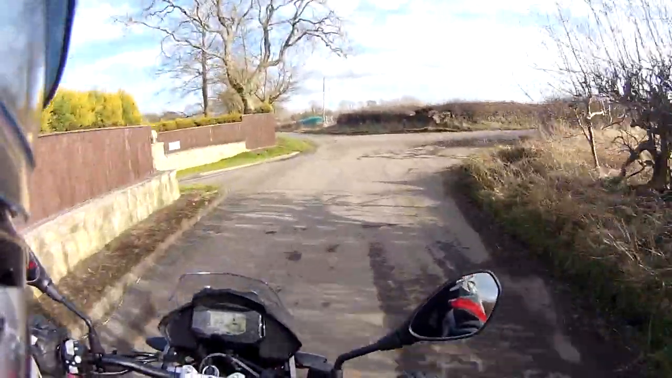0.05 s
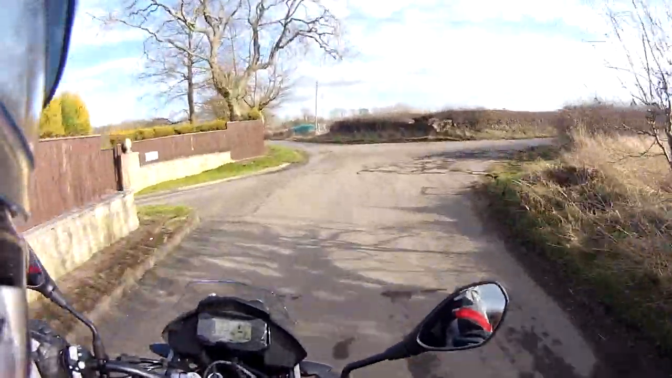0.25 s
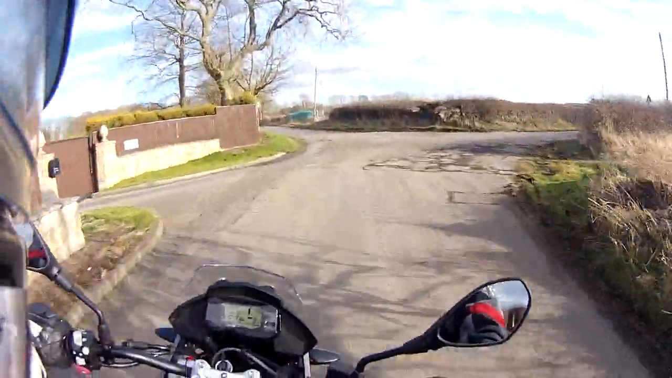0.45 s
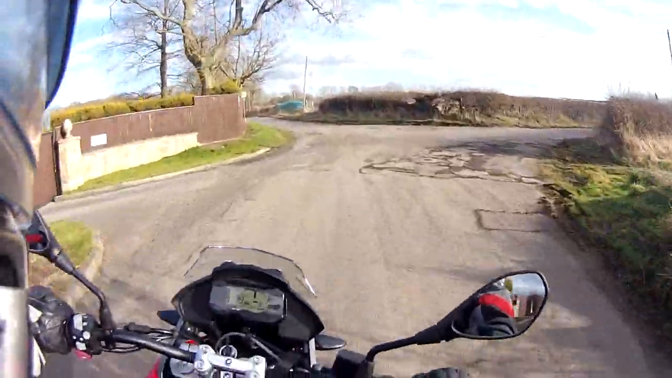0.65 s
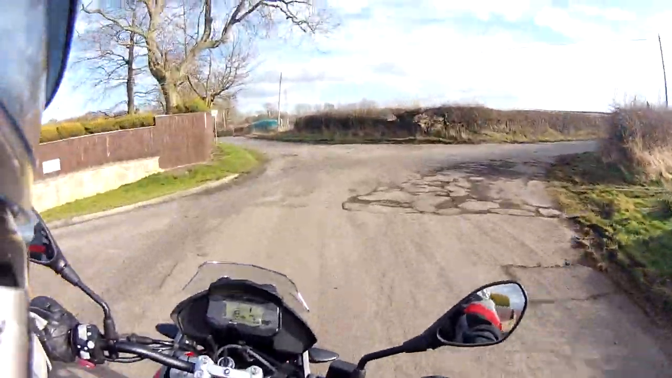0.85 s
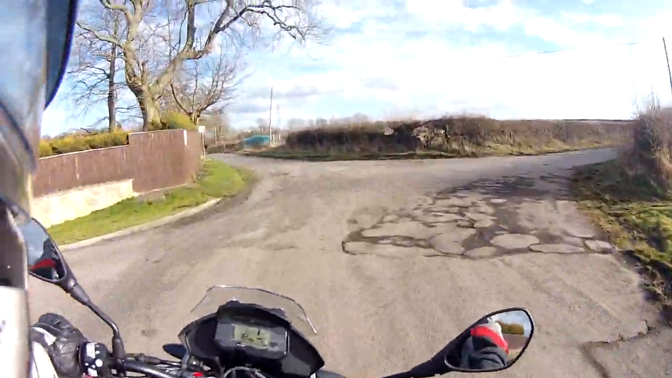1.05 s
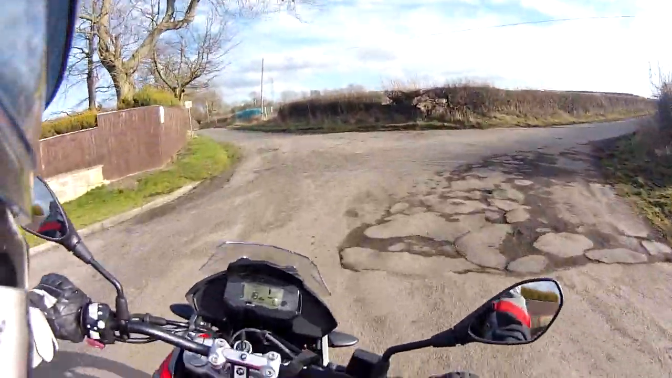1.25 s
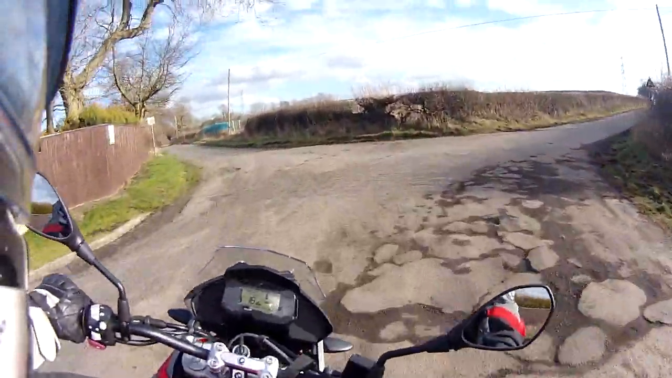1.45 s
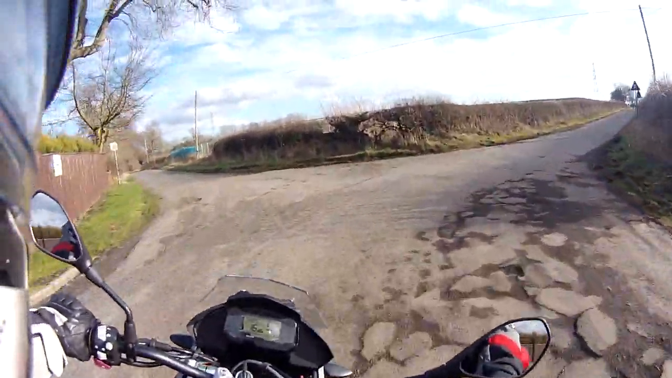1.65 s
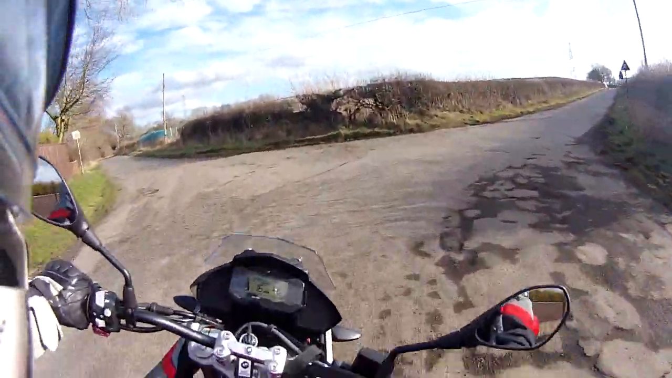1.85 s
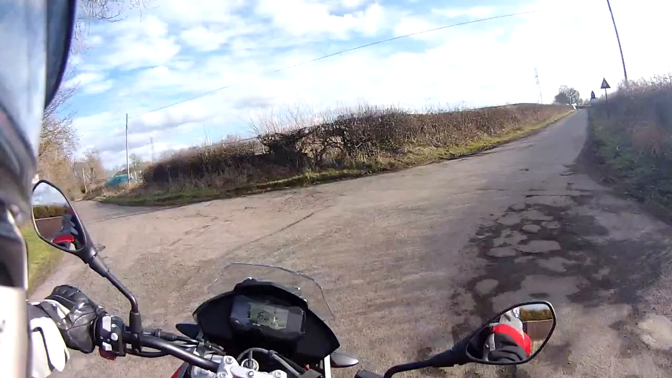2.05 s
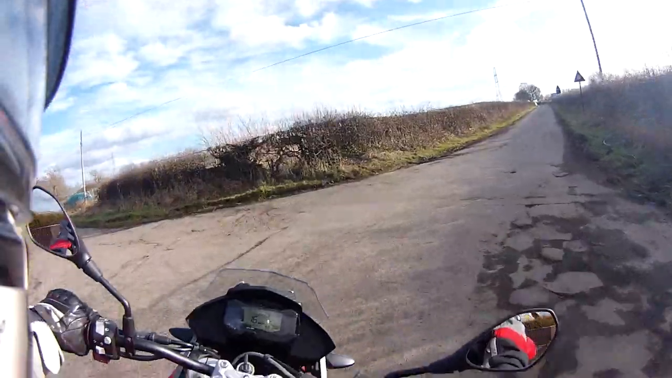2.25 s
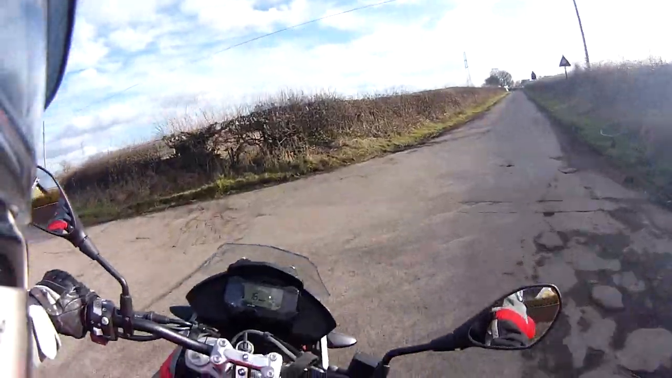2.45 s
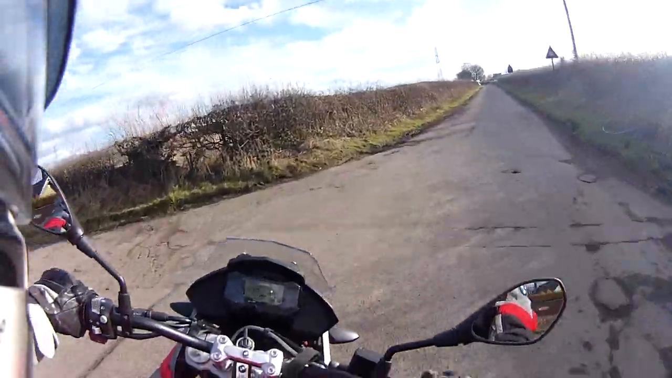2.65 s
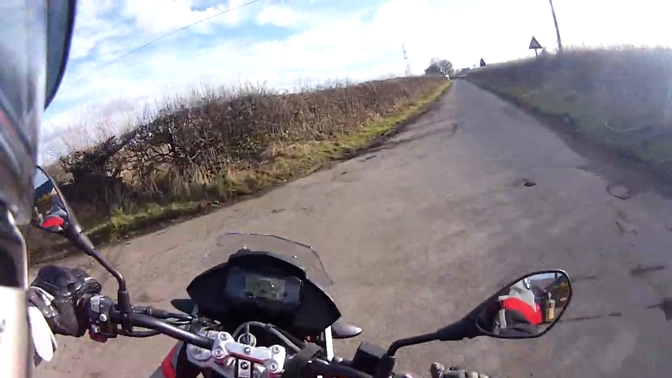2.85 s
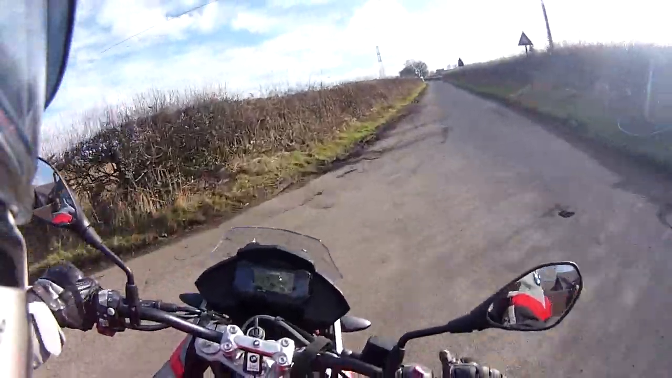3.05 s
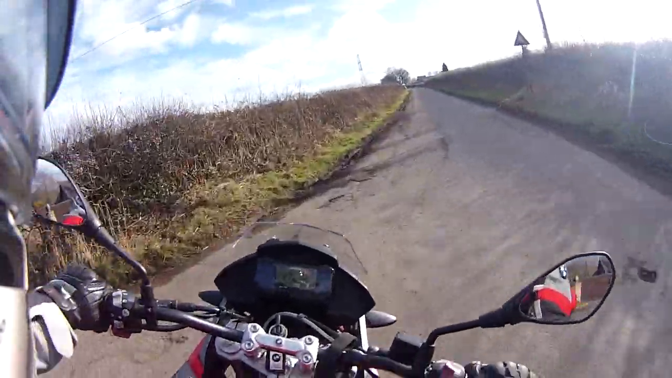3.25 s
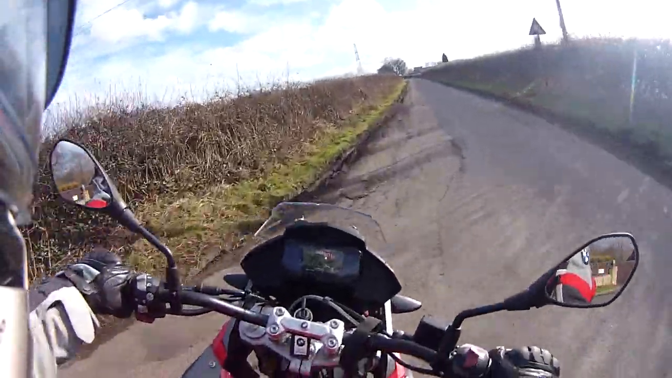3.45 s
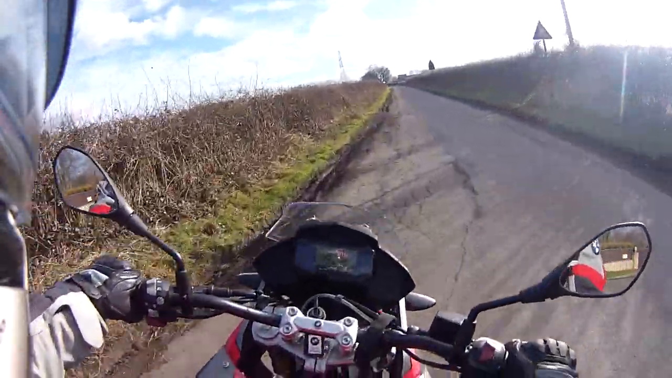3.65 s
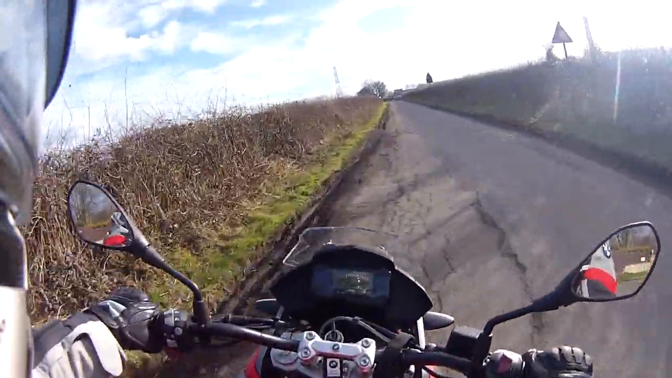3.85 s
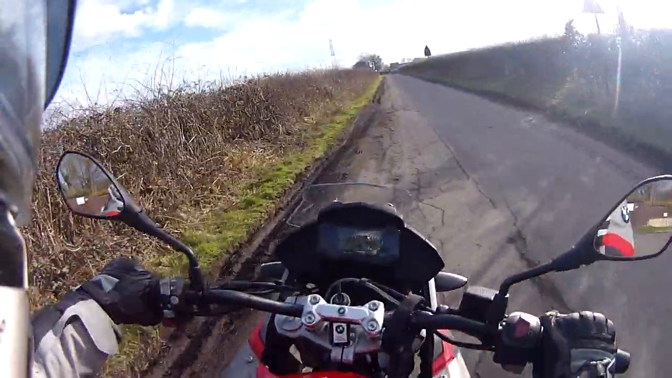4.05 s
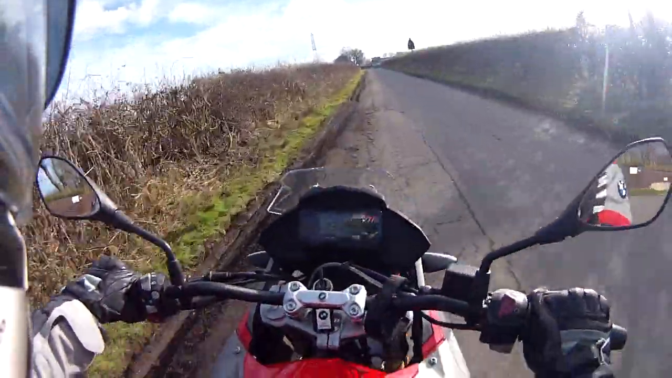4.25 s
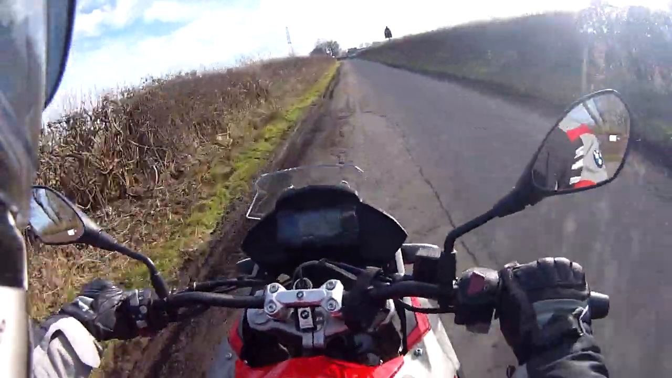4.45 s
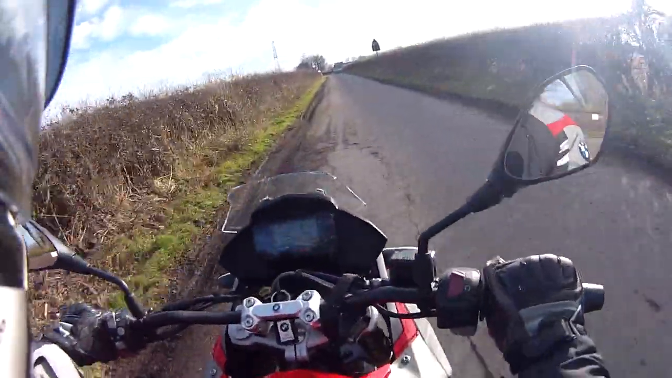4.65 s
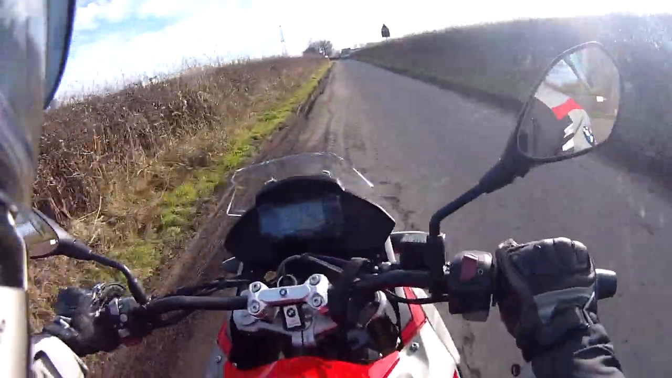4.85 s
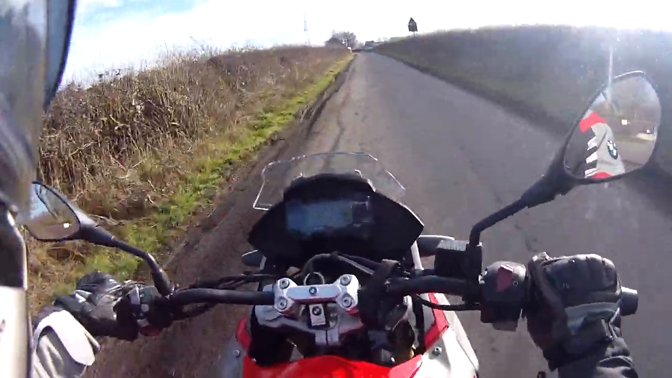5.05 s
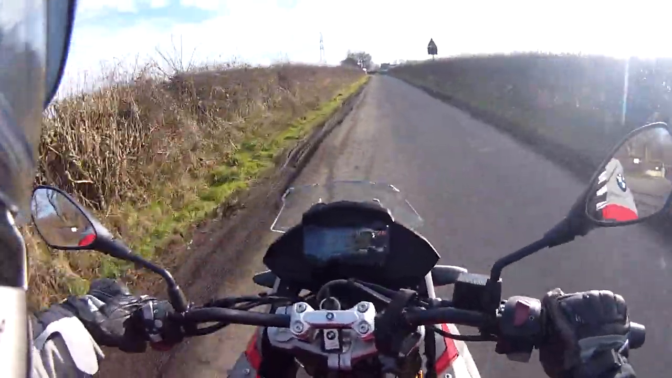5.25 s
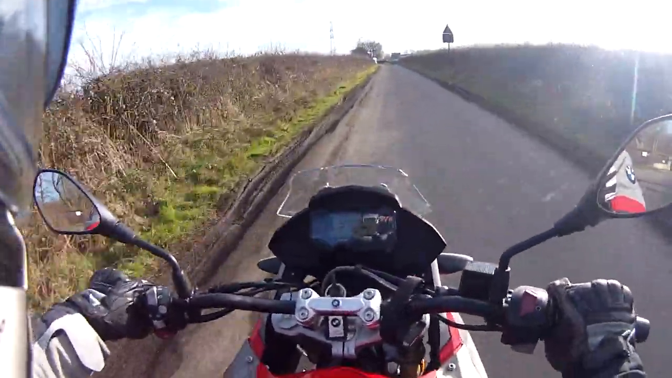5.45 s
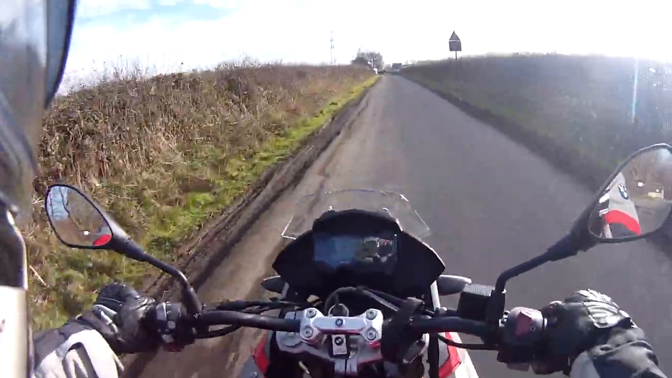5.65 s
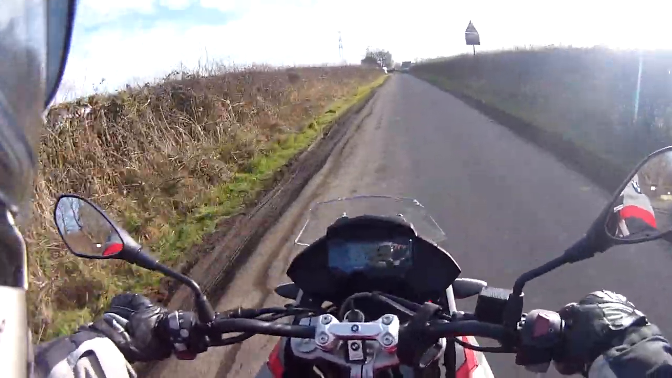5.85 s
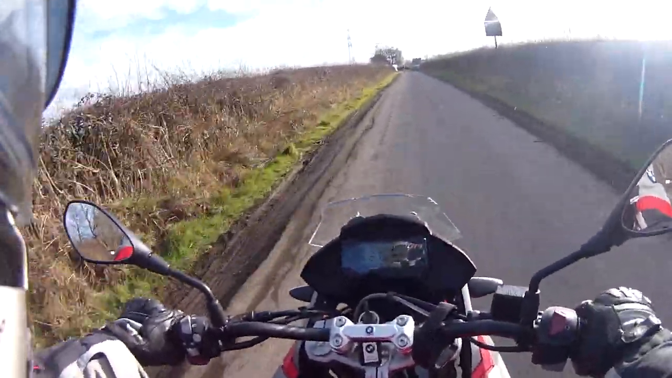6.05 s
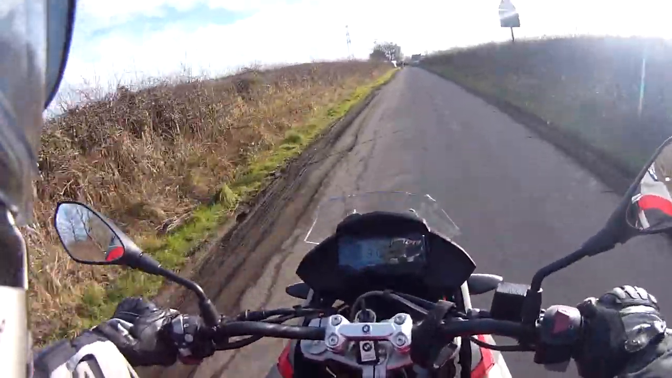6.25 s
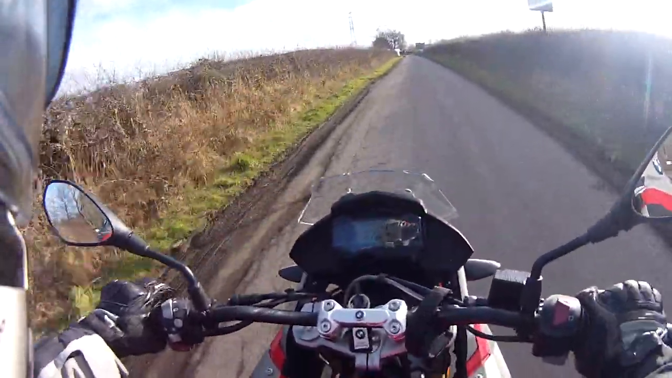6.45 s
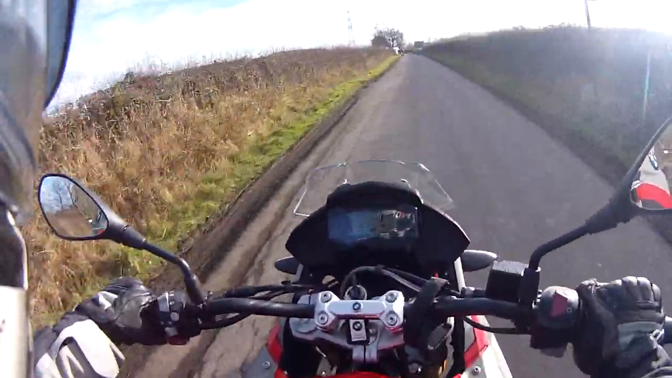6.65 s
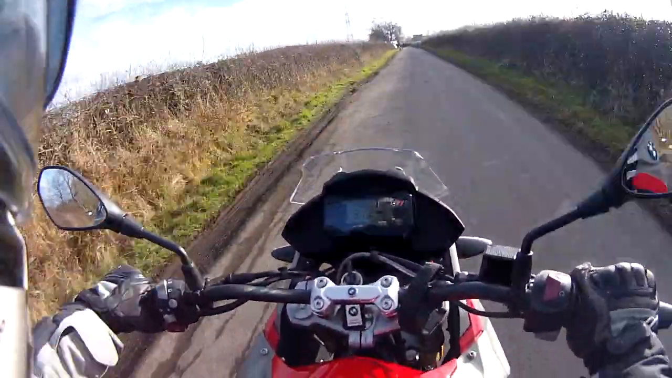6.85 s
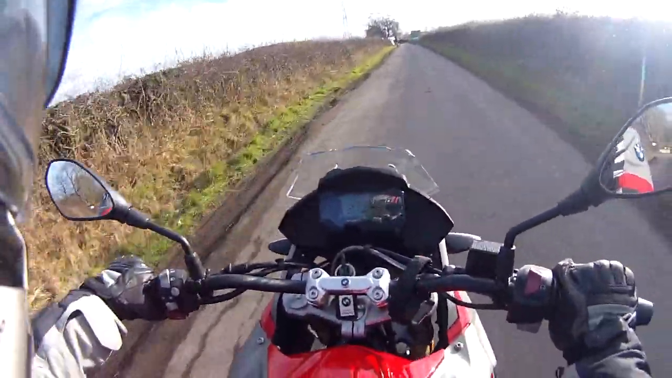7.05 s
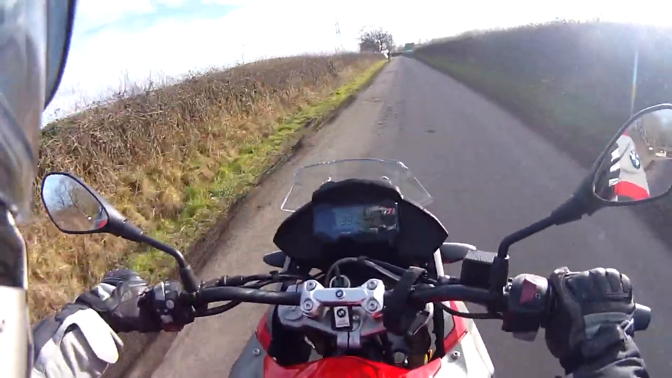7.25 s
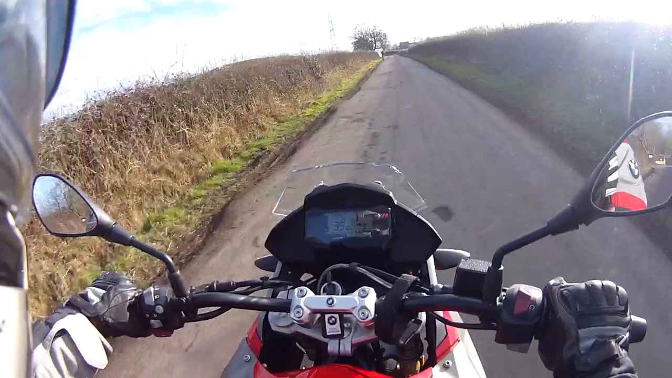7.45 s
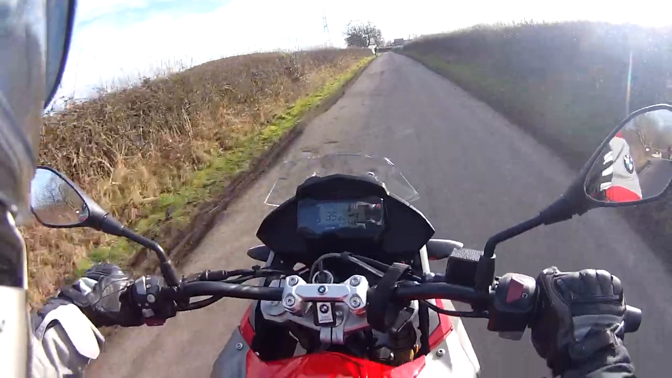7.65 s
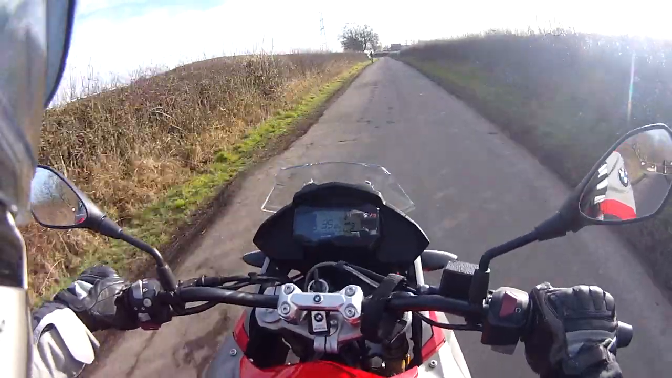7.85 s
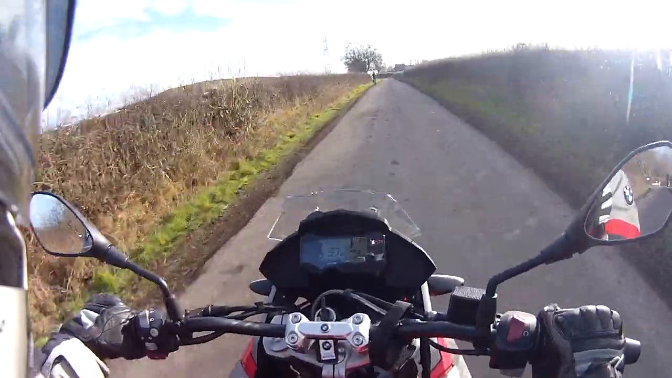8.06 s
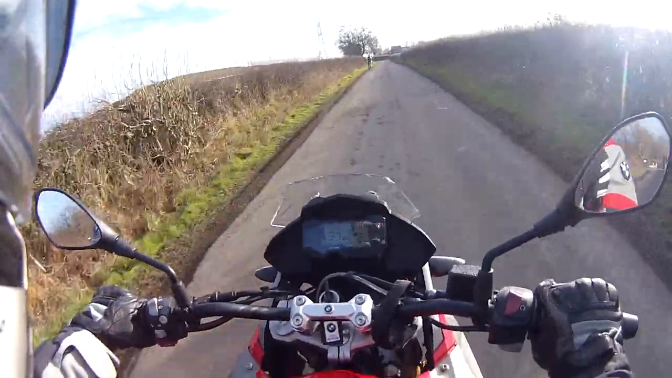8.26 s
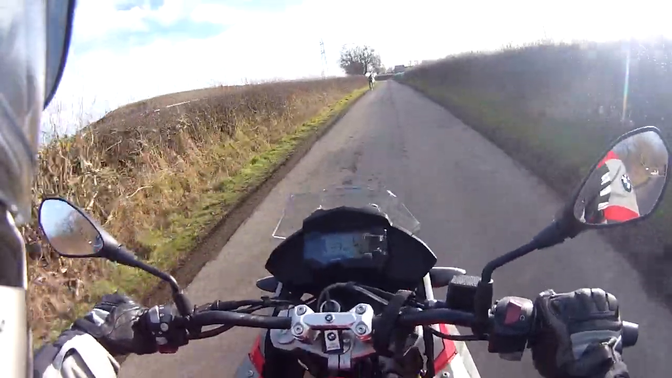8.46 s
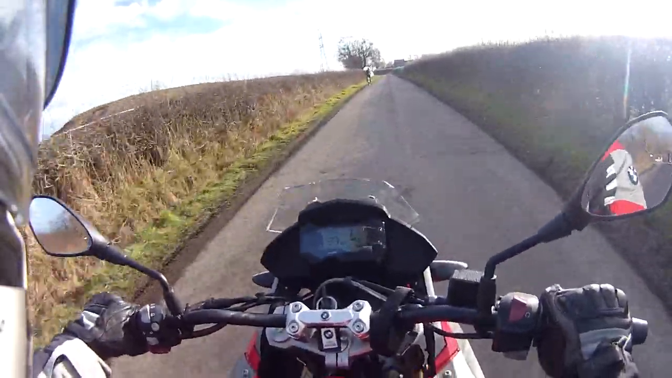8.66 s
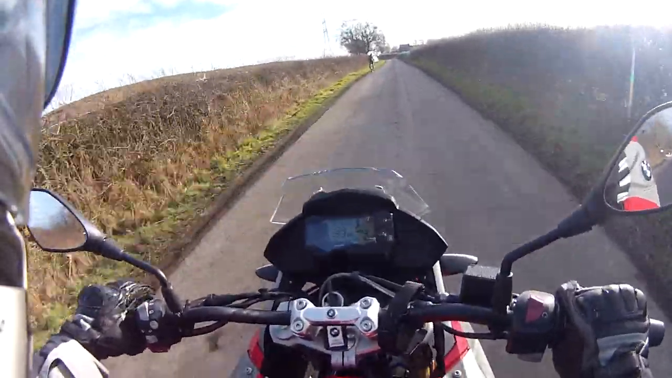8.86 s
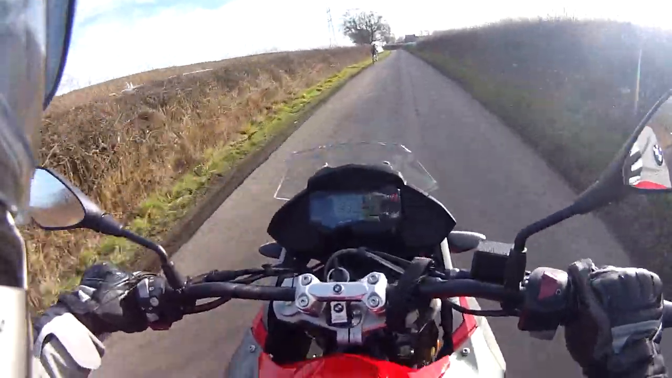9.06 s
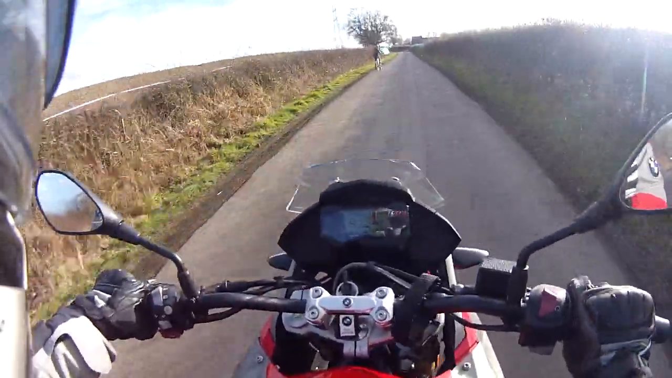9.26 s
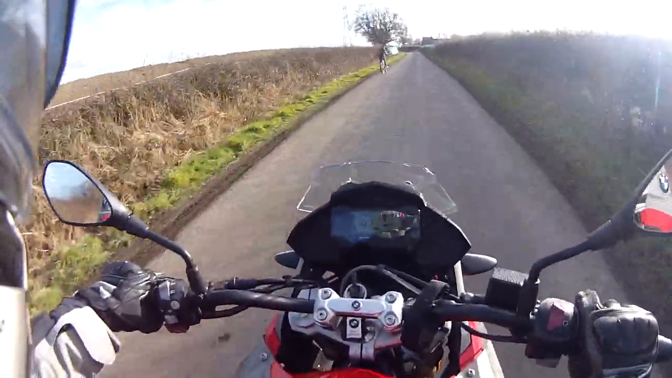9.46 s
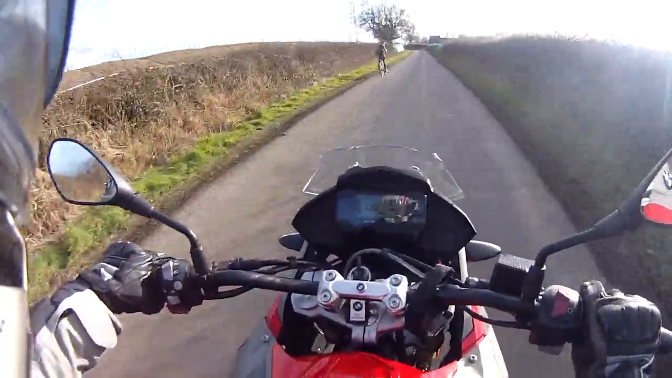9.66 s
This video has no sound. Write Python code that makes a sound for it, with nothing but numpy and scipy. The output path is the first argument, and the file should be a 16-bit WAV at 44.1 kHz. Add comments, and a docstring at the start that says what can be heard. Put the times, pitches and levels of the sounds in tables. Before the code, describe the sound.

A single-cylinder motorcycle putters at low revs on a country lane, with soft exhaust thuds and a light mechanical patter. The throttle opens and the engine climbs into a louder, barking growl. The revs drop briefly for one upshift, then rise again more slowly. Wind buffets the helmet microphone harder as the speed grows, ending in thumping gusts over the engine.

```python
"""A single-cylinder motorcycle rolls through a bend, pulls away, shifts up once and pulls again,
heard from the rider's helmet. Each engine cycle gives an exhaust thud, a ringing intake bark and a
patter of valve and gear noise. Wind buffets the one microphone harder as the speed grows; a faint
electrical whine runs underneath. The camera's gain control ducks everything after loud peaks."""
import sys
import numpy as np
from scipy import signal
from scipy.fft import rfft, irfft, next_fast_len
from scipy.io import wavfile
from scipy.ndimage import uniform_filter1d, map_coordinates

SR = 44100
rng = np.random.default_rng(int(sys.argv[2]) if len(sys.argv) > 2 else 0)


def transcribe(signal):
    """Save signal, clipped to [-1, 1], as a 16-bit WAV file at the path in sys.argv[1]."""
    frames = np.atleast_2d(signal).T
    limited = np.clip(frames, -1, 1)
    pcm = np.round(limited * 32767).astype(np.int16)
    wavfile.write(sys.argv[1], SR, pcm)


N = 428211


def engine_boom(cycle, firing_hz, throttle):
    """Low firing harmonics: gas pressure opposes piston shake and overtakes it under load."""
    # low engine orders: (multiple of firing rate, piston shake [dB], gas pressure [dB])
    orders = [(2, -20, -5), (3, -12, -5.5), (4, 2, 4), (5, -14.5, -12.5)]
    # pipe response: (frequency [Hz], gain [dB])
    pipe = [(52, 3), (66, 8.5), (100, -0.5), (125, 2), (165, 2.5), (200, -3), (222, 9), (255, 13),
            (290, 11.5)]
    # clutch pulled, the freed engine shakes harder: (time [s], added shake [dB], width [s])
    clutch_pulls = [(5.8, 5, .08), (6.02, 9.5, 0.091)]
    shake = engine_gain(firing_hz, throttle, shut_db=-34, octave_db=5.4) * (1 + swells(clutch_pulls))
    pressure = engine_gain(firing_hz, throttle, shut_db=-19.5, octave_db=3.74) * throttle ** 1.32
    pipe_hz, pipe_db = np.transpose(pipe)
    boom = np.zeros(N)
    for order, shake_db, pressure_db in orders:
        pipe_gain = amp(np.interp(order * firing_hz, pipe_hz, pipe_db) + 0.6 * wobble(13))
        force = amp(shake_db) * shake - amp(pressure_db) * pressure
        boom += pipe_gain * force * np.cos(2 * np.pi * order * cycle)
    return boom


def exhaust_growl(cycle, firing_hz, throttle, smear_cycles=0.71, sixth_db=-6):
    """Firing harmonics 6-23 glide through the pipe's fixed resonances; the sixth is weak."""
    # pipe resonances: (frequency [Hz], gain [dB])
    resonances = [(150, 1.5), (235, 0), (272, 5.5), (335, -7.5), (380, -8), (435, -9), (520, -8),
                  (620, -13.5), (700, -13.5), (780, -8), (870, -47), (1000, -6), (1300, -33)]
    pipe_hz, pipe_db = np.transpose(resonances)
    growl = np.zeros(N)
    for order in range(6, 24):
        level_db = np.interp(order * firing_hz, pipe_hz, pipe_db) + sixth_db * (order == 6)
        phase = 2 * np.pi * (order * cycle + smear_cycles * (rng.random() - .5))
        growl -= amp(level_db + 2.1 * wobble(12)) * np.cos(phase)
    gain = engine_gain(firing_hz, pipe_drive(throttle), shut_db=-36.5, octave_db=4.1, open_db=14.4)
    return gain * steady(growl)


def exhaust_thuds(cycle, firing_hz, throttle):
    """Firings ring the silencer: ragged and muffled on a shut throttle, even under load."""
    # silencer modes: (frequency [Hz], level [dB], t60 [s])
    silencer = [(258, 2.5, 0.17), (270.2, 5.5, 0.097), (409.8, 5.5, 0.054), (472, -1, 0.029),
                (636, -20, 0.02), (781, -1.5, 0.14)]
    ragged = .3 * (1 - throttle) + .12 * throttle
    blows = pulses(cycle, scatter_db=1.2, jitter_ms=.05) + ragged * puffs(cycle, decay_cycles=.35)
    pipe = band(ring(blows, silencer), low_hz=212, high_hz=890, order=3)
    muffled = band(pipe, low_hz=152, high_hz=380)  # weak firings barely reach the upper modes
    thuds = throttle * pipe + (1 - throttle) * (muffled + .3 * pipe)
    gain = engine_gain(firing_hz, pipe_drive(throttle), shut_db=-36, octave_db=3.8, open_db=12)
    return gain * steady(thuds)


def intake_bark(cycle, firing_hz, throttle, duct_echo=0.32, duct_delay_s=.0075):
    """Each gulp of air rings the airbox and returns from the duct as a second, softer bark."""
    # airbox modes: (frequency [Hz], level [dB], t60 [s])
    airbox = [(1099, 3.5, 0.037), (1172, 1, 0.038), (1260, -8, 0.029)]
    turbulence = np.interp(firing_hz, [42, 58], [.17, .45])  # faster flow is rougher
    gulps = pulses(cycle, scatter_db=.6, jitter_ms=.03) + turbulence * puffs(cycle, decay_cycles=.4)
    gulps = gulps + duct_echo * np.roll(gulps, round(duct_delay_s * SR))
    bark = band(ring(gulps, airbox), low_hz=954, high_hz=1302, order=3)
    return engine_gain(firing_hz, throttle, shut_db=-50, octave_db=2, open_db=37.47) * steady(bark)


def valve_clatter(cycle, firing_hz, throttle):
    """Valves and gears patter at low revs and merge into a rasp at high revs."""
    # low-rev patter: (frequency [Hz], density [dB])
    patter_spectrum = [(300, -48), (400, -4.5), (600, 0), (690, -4), (780, 1.5), (880, -3), (1200, -1),
                       (1330, -3), (1480, 0), (1700, -2.5), (1950, -1), (2400, -11), (3300, -13.5),
                       (3750, -15), (4080, -9.5), (4500, -29), (5200, -42)]
    # high-rev rasp: (frequency [Hz], density [dB])
    rasp_spectrum = [(300, -1.5), (600, -5), (900, -1), (1400, -3), (1650, -5.5), (1900, -1.5),
                     (2350, -9.5), (3100, -15), (4050, -18.5), (4600, -30), (5300, -56)]
    # loose parts over bumps: (time [s], level [dB], width [s])
    rattles = [(.415, -33, 0.0061), (.435, -32, .006), (1.78, -41, 0.014)]
    patter = 0.45 * puffs(cycle, decay_cycles=0.36) + 0.39 * puffs(2 * cycle + .3, decay_cycles=0.13)
    patter = coloured(patter + 1.1 * rng.standard_normal(N), patter_spectrum)
    rasp = coloured(.5 * puffs(cycle, decay_cycles=0.42) + 1.5 * rng.standard_normal(N), rasp_spectrum)
    rasp_share = np.interp(firing_hz, [30, 45], [0, 1])
    gain = engine_gain(firing_hz, throttle, shut_db=-30.5, octave_db=8.74, open_db=6.2)
    envelope = gain * amp(0.71 * wobble(35)) + swells(rattles)
    return envelope * (np.sqrt(1 - rasp_share) * patter + np.sqrt(rasp_share) * rasp)


def engine_hiss(cycle, firing_hz, throttle):
    """The machine's fine treble fizz, with a few bright ticks."""
    # fizz: (frequency [Hz], density [dB])
    spectrum = [(2500, -34), (4500, 5), (5100, -3.5), (5700, 1.5), (6500, -6.5), (7200, 1.5), (8000, -4.5),
                (9100, 3.5), (10000, -1), (11500, 0), (12600, -6), (13200, -9), (15300, -19)]
    # ticks near the microphone: (time [s], level [dB], width [s])
    ticks = [(2.151, -44, 0.0023), (2.24, -57, 0.013), (2.33, -54, 0.012), (7.925, -39, .002),
             (8.155, -30, .003), (8.925, -30, .003)]
    fizz = coloured(rng.standard_normal(N) + .5 * puffs(cycle, decay_cycles=0.21), spectrum)
    gain = engine_gain(firing_hz, throttle, shut_db=-50, octave_db=12.3, open_db=1.4)
    return (gain * amp(0.67 * wobble(25)) + swells(ticks)) * fizz


def wind():
    """Eddies round the helmet thump on the microphone; single blasts stand out."""
    # buffeting: (time [s], level [dB])
    airflow = [(0, -33), (.8, -36.5), (2.1, -31), (2.7, -32), (3.6, -26.5), (4.8, -22.5), (5.5, -14.5),
               (5.9, -20), (6.7, -19), (7.1, -20.5), (7.55, -11), (8.3, -10), (9.2, -9), (9.71, -7)]
    # air blasts: (time [s], level [dB], width [s])
    gusts = [(1.77, -28, 0.016), (1.97, -27, 0.011), (4.9, -22, 0.031), (5.28, -19, 0.018),
             (6.21, -6.5, 0.0085), (6.6, -13, 0.0083), (6.77, -5, 0.0087), (6.9, -3, 0.01),
             (7.55, -8, 0.023), (7.92, -8.5, 0.02), (8.08, -3.5, 0.014), (8.15, 3.5, 0.01),
             (8.59, -4, 0.021), (8.645, -0.5, 0.012), (8.92, 2, 0.011), (9.39, 0.5, .02), (9.47, 2, 0.011)]
    # wind rumble: (frequency [Hz], density [dB])
    rumble = [(12, -21), (28, -9), (55, -4), (100, -3), (160, -2.5), (260, -10.5), (400, -15), (800, -30),
              (2000, -51), (6000, -60), (15000, -85)]
    buffet_db = curve(airflow) + 1 + 0.89 * wobble(22)
    eddies = steady(coloured(rng.standard_normal(N), rumble), span_s=0.036)
    blasts = steady(coloured(rng.standard_normal(N), rumble), span_s=.018)
    return amp(buffet_db) * eddies + swells(gusts) * blasts


def whine(hz=10519, level_db=-53):
    """A thin, steady electrical tone in the microphone."""
    return amp(level_db) * np.sin(2 * np.pi * hz * np.arange(N) / SR)


def engine_gain(firing_hz, throttle, shut_db, octave_db, open_db=0, cruise_hz=28):
    """shut_db at cruise revs, plus octave_db per doubling of revs and open_db at full throttle."""
    return amp(shut_db + octave_db * np.log2(firing_hz / cruise_hz) + open_db * throttle)


def pipe_drive(throttle):
    """A small throttle opening already wakes the pipe."""
    return throttle ** 0.49


def pulses(cycle, scatter_db, jitter_ms):
    """One impulse per cycle, scattered in size and timing; rms 1."""
    onsets = np.interp(np.arange(1, int(cycle[-1])), cycle, np.arange(N))
    size, late = rng.standard_normal((len(onsets), 2)).T
    onsets = np.clip(np.round(onsets + late * jitter_ms * SR / 1000), 0, N - 1).astype(int)
    return unit(np.bincount(onsets, amp(scatter_db * size), N))


def puffs(cycle, decay_cycles):
    """One decaying noise burst per cycle; rms 1."""
    return unit(rng.standard_normal(N) * np.exp(-(cycle % 1) / decay_cycles))


def ring(x, modes):
    """x through decaying modes."""
    t = np.arange(SR // 5) / SR
    body = sum(amp(db - 60 * t / t60_s) * np.cos(2 * np.pi * hz * t) for hz, db, t60_s in modes)
    return signal.fftconvolve(x, body)[:N]


def band(x, low_hz, high_hz, order=2):
    """Causal band-pass."""
    return signal.sosfilt(signal.butter(order, [low_hz, high_hz], "band", fs=SR, output="sos"), x)


def filtered(x, response):
    """x through a frequency response."""
    size = next_fast_len(N + SR // 2)
    return irfft(rfft(x, size) * response(np.fft.rfftfreq(size, 1 / SR)), size)[:N]


def coloured(x, spectrum):
    """x shaped by a spectrum; rms 1."""
    knots_hz, db = np.transpose(spectrum)
    return unit(filtered(x, lambda hz: amp(np.interp(np.log(hz + 1), np.log(knots_hz), db))))


def swells(rows):
    """Envelope of Gaussian swells."""
    t = np.arange(N) / SR
    return sum(amp(db) * np.exp(-.5 * np.minimum(((t - at_s) / width_s) ** 2, 100))
               for at_s, db, width_s in rows)


def curve(rows):
    """Breakpoints interpolated per sample."""
    times_s, values = np.transpose(rows)
    return np.interp(np.arange(N) / SR, times_s, values)


def wobble(rate_hz):
    """Smooth random curve with knots at rate_hz."""
    knots = rng.standard_normal(int(N * rate_hz / SR) + 4)
    return map_coordinates(knots, [np.arange(N) * rate_hz / SR])


def steady(x, span_s=0.15):
    """x held at rms 1 over about span_s."""
    size = int(span_s * SR)
    power = uniform_filter1d(uniform_filter1d(x ** 2, size), size)
    return x / np.sqrt(np.abs(power) + 1e-12)


def unit(x):
    """x at rms 1."""
    return x / np.sqrt(np.mean(x ** 2) + 1e-20)


def amp(db):
    """Decibels to gain."""
    return 10 ** (np.asarray(db) / 20)


def scene(valve_lead_cycles=0.0712):
    """Revs and throttle drive every engine sound; one microphone feeds both channels."""
    # engine speed: (time [s], firing rate [Hz])
    revs = [(0.0, 29.57), (0.5, 23.87), (0.9, 22.06), (1.08, 27.76), (1.55, 25.6), (1.75, 28.39),
            (2.05, 26.41), (3.0, 29.16), (3.7, 33.56), (3.95, 37.33), (4.7, 45.64), (5.15, 51.82),
            (5.6, 56.42), (5.82, 40.76), (6.05, 31.69), (6.25, 44.78), (6.4, 40.4), (7.4, 46.2),
            (8.6, 53.7), (9.3, 56.37), (9.71, 59.18)]
    # rider's hand: (time [s], throttle opening [0-1])
    twist_grip = [(0, 0.07), (.9, 0), (1.1, 0), (1.6, 0), (1.8, 0.22), (2.9, 0.29), (3.35, 0.47),
                  (3.8, 0.54), (4.35, 0.97), (5.52, 0.95), (5.68, 0.6), (5.77, 0.41), (6.05, 0.23),
                  (6.35, 0.44), (6.48, 0.91), (7.0, 0.98), (9.71, 0.86)]
    firing_hz, throttle = curve(revs), curve(twist_grip)
    cycle = np.cumsum(firing_hz) / SR
    harmonics = sum(part(cycle, firing_hz, throttle) for part in (engine_boom, exhaust_growl))
    strokes = sum(part(cycle + valve_lead_cycles, firing_hz, throttle)
                  for part in (exhaust_thuds, intake_bark, valve_clatter, engine_hiss))
    mono = harmonics + strokes + wind() + whine()
    return np.array([mono, mono])


def record(dry, ceiling_db=-12, detect_s=.007, recover_db_per_s=8.5, top_hz=15300):
    """The camera ducks at once above its ceiling, recovers slowly and cuts everything over top_hz."""
    power = uniform_filter1d(dry[0] ** 2, int(detect_s * SR))
    excess_db = np.maximum(10 * np.log10(np.abs(power) + 1e-12) - ceiling_db, 0)
    recovery_db = recover_db_per_s * np.arange(N) / SR
    duck_db = np.maximum.accumulate(excess_db + recovery_db) - recovery_db
    return np.array([filtered(side * amp(-duck_db), lambda hz: hz < top_hz) for side in dry])


dry = scene()
out = record(dry)
transcribe(out)
```